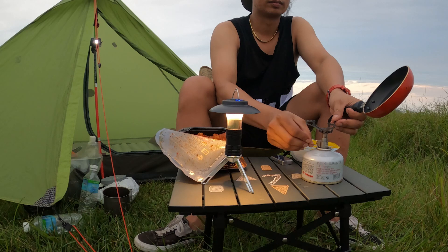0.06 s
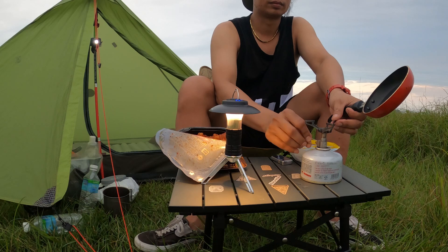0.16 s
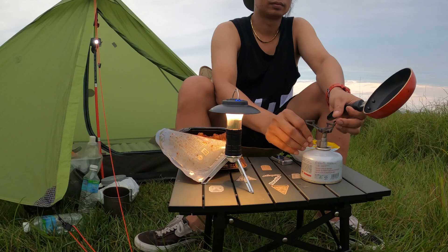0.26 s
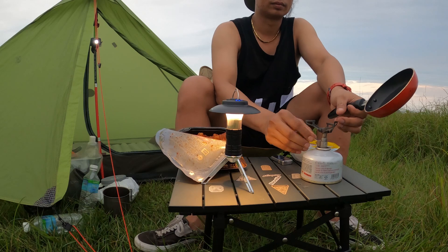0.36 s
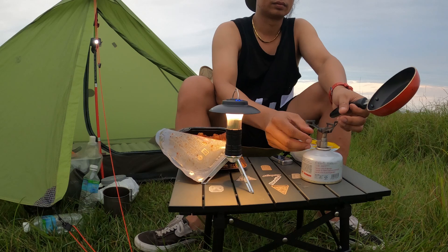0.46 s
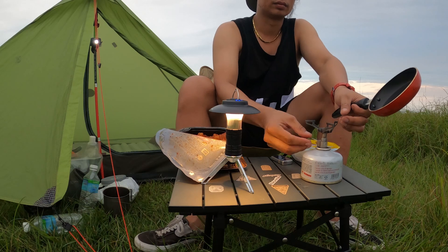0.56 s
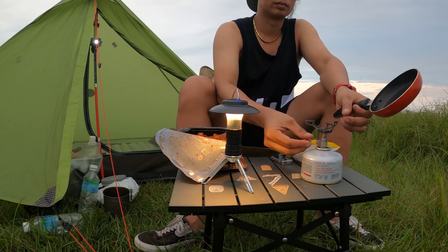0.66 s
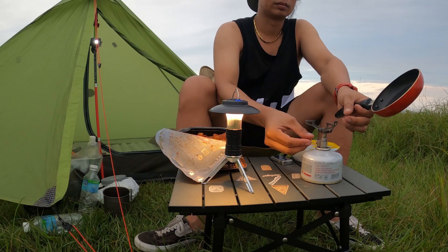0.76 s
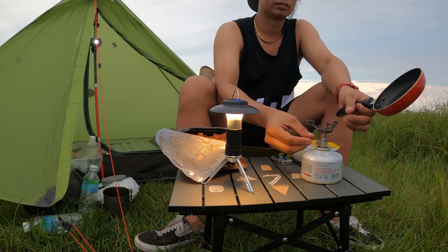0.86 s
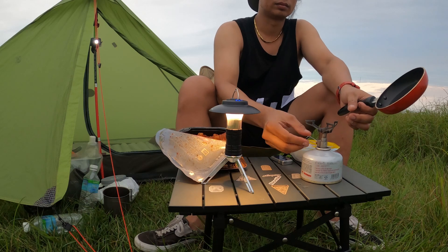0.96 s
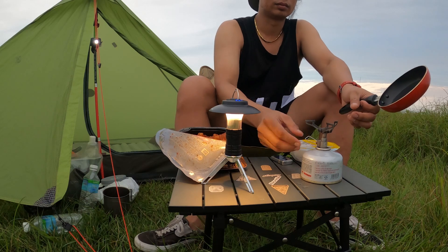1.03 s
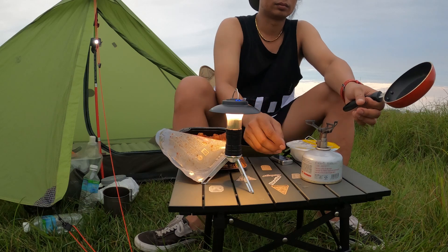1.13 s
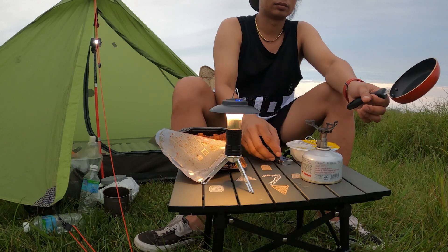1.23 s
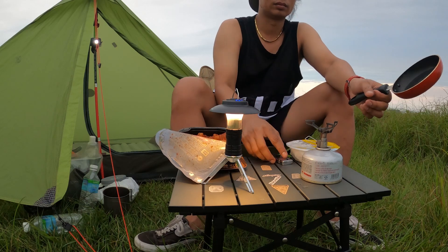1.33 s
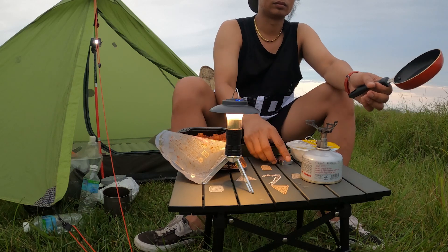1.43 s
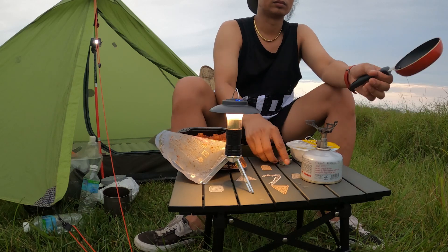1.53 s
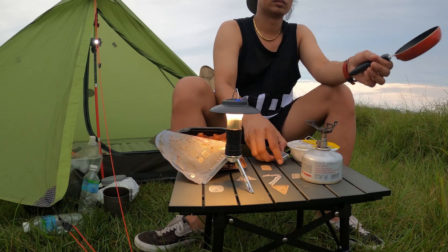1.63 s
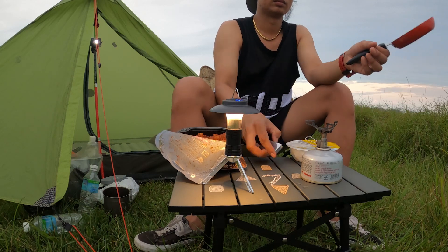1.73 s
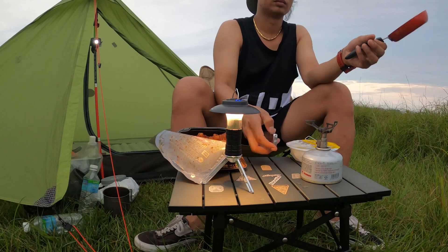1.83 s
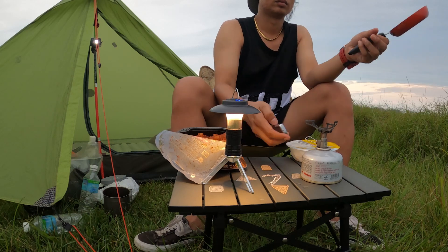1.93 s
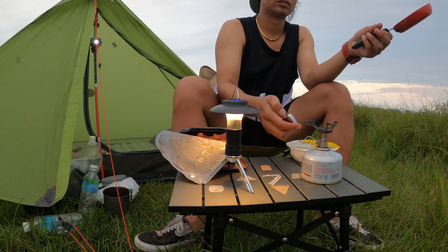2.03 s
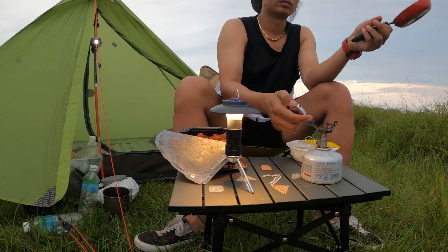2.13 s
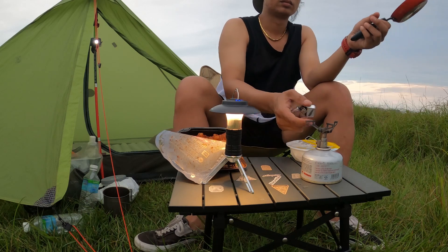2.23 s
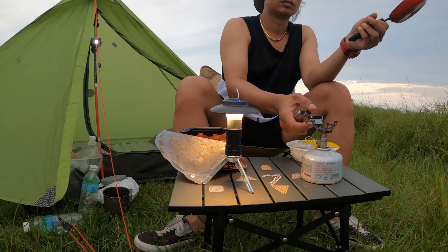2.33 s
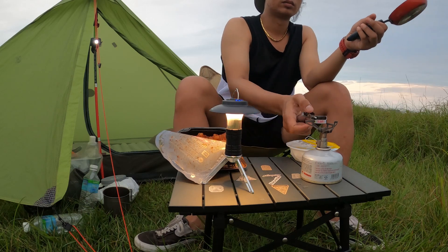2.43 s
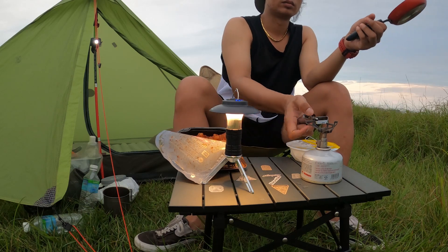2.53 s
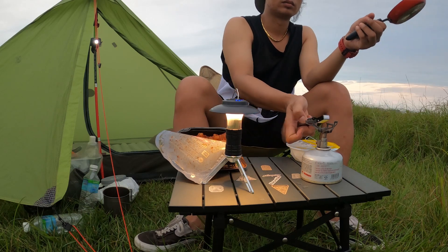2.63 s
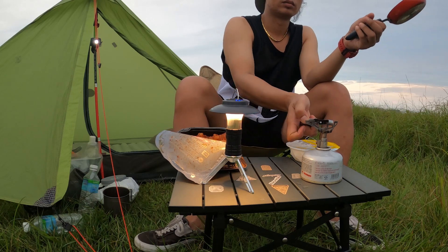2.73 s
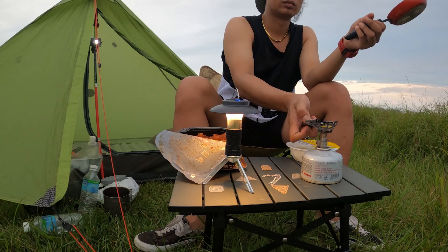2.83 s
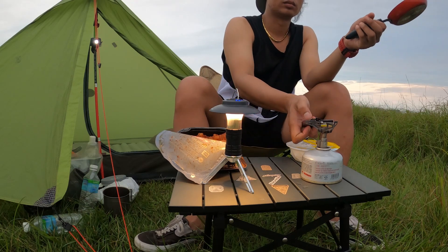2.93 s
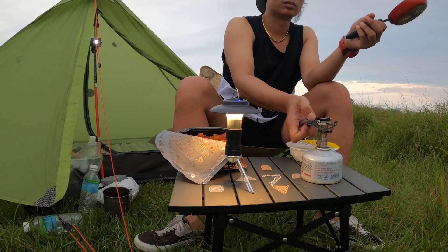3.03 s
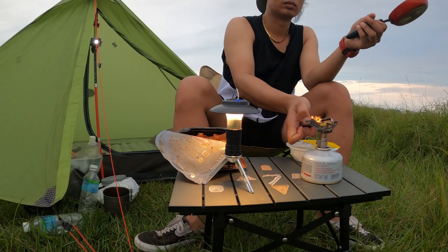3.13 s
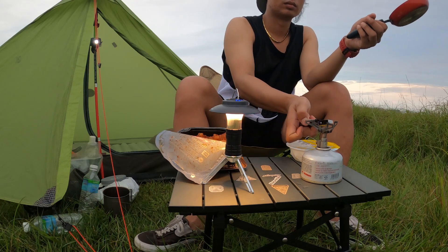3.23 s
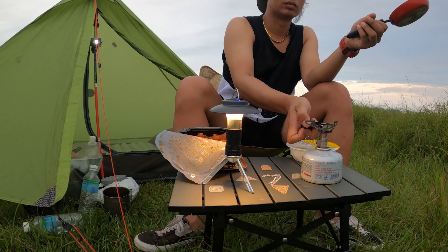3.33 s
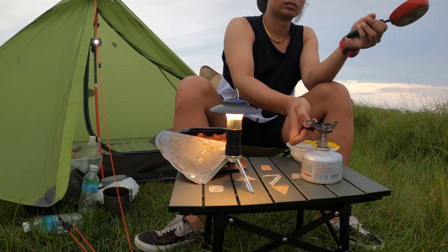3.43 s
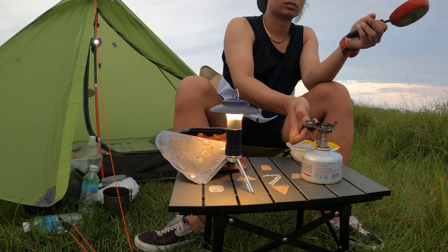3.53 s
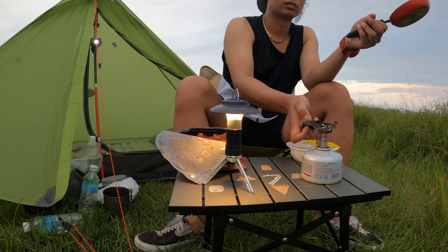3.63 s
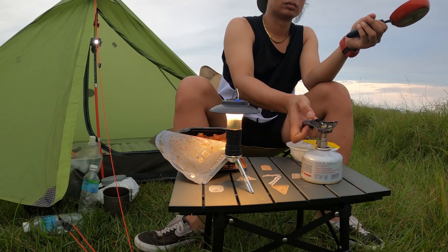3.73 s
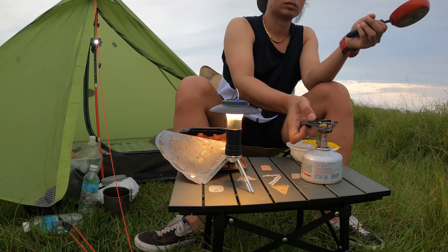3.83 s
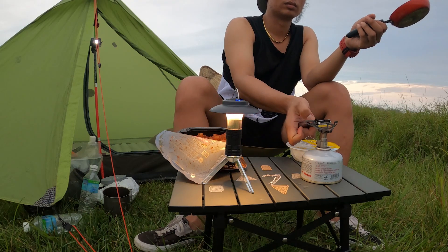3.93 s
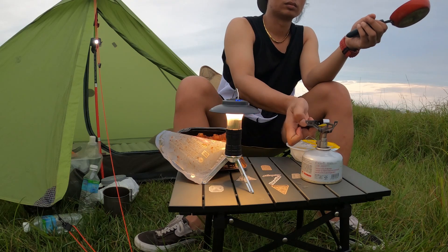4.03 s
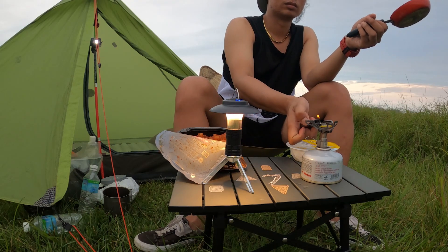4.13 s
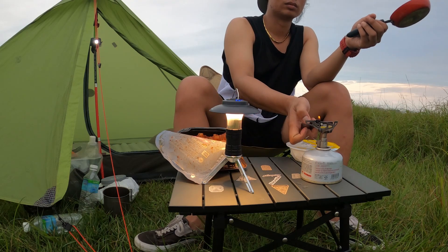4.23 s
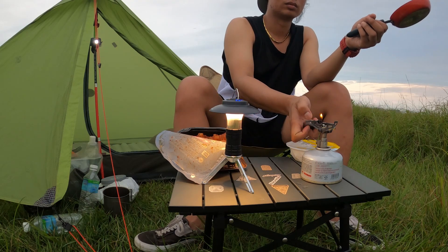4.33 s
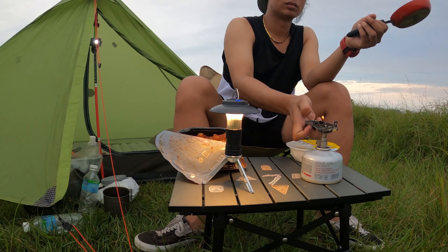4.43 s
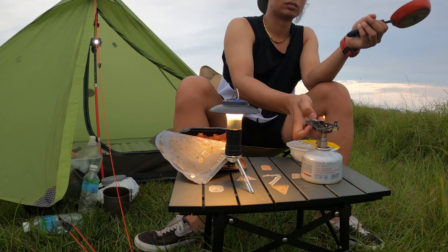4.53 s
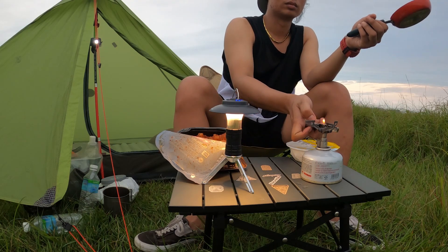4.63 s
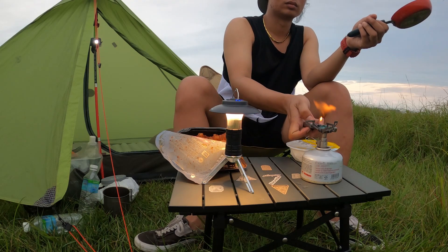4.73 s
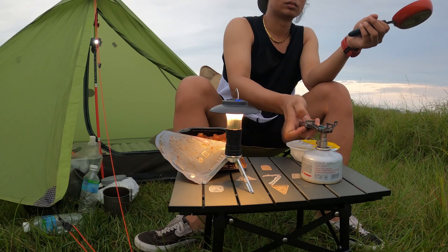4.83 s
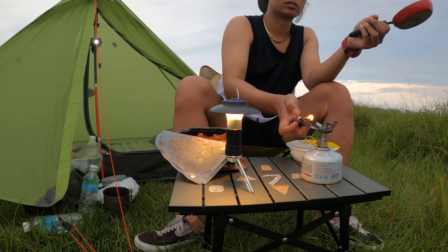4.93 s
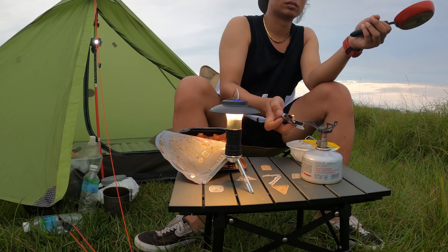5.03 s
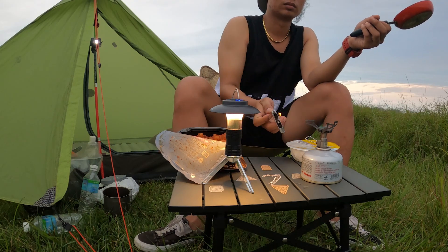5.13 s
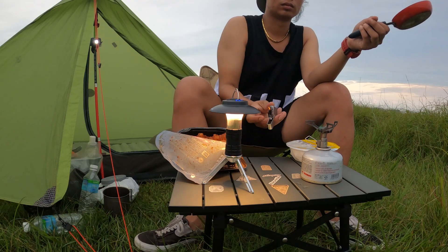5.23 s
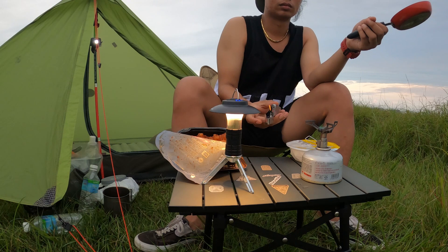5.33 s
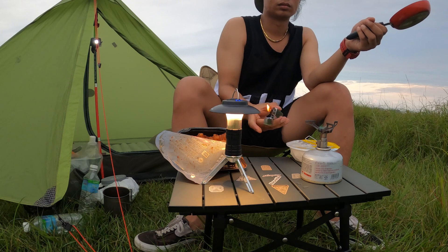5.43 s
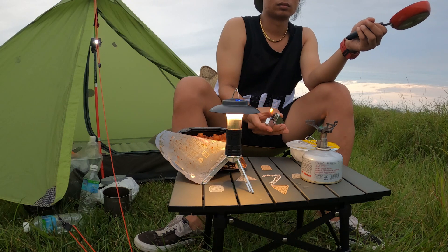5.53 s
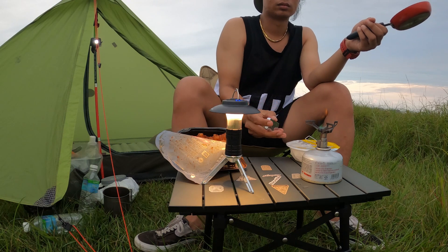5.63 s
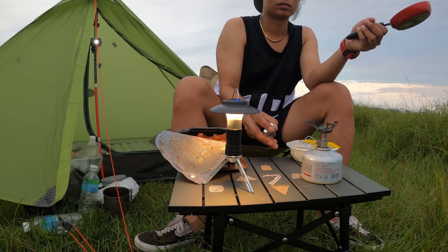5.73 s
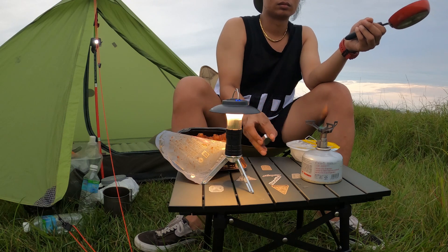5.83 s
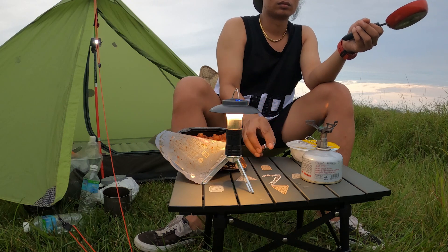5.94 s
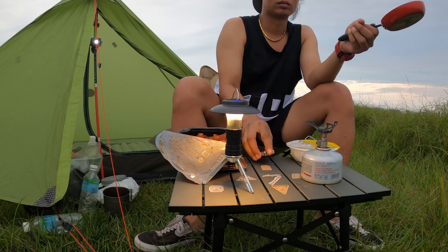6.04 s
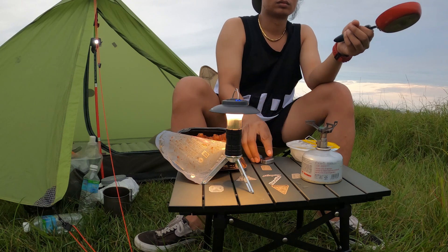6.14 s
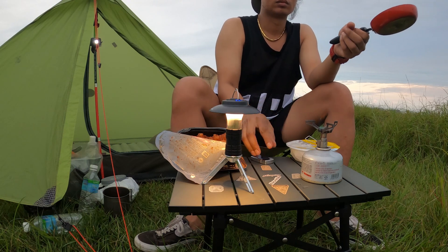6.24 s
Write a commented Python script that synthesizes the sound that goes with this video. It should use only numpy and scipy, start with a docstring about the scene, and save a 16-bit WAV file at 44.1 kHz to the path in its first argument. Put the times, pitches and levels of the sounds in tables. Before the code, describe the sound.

Gas stove hisses open outdoors, metal lighter flicks open, three flint strikes, then the burner catches with a thump and rushes steadily until the lid snaps shut.

```python
"""Outdoors at a slatted metal table, a camper opens a gas stove's valve and flicks open a flip-lid lighter.
Three strokes of the flint wheel sound over the hiss; the gas catches with a thump and burns with a steady
rush; the lid snaps shut. Low rumble and crickets in the grass lie behind.
Hiss, rush and rumble are shaped noise; contacts are bursts of grit, and struck metal adds dying tones.
Crickets are pulsing, falling tones; the thump is one low push of pressure."""
import sys
import numpy as np
from scipy import signal
from scipy.fft import rfft, irfft, next_fast_len
from scipy.io import wavfile
from scipy.ndimage import uniform_filter1d

SR = 44100
rng = np.random.default_rng(int(sys.argv[2]) if len(sys.argv) > 2 else 0)


def file_out(sig):
    """Save sig as 16-bit WAV at sys.argv[1]."""
    # one column per channel
    cols = np.atleast_2d(sig).T
    # limit, then scale
    lim = np.clip(cols, -1, 1)
    pcm = np.round(lim * 32767).astype(np.int16)
    wavfile.write(sys.argv[1], SR, pcm)


N = 276948
TIME = np.arange(N) / SR  # seconds
BINS = np.fft.rfftfreq(N, 1 / SR)  # Hz

# How strong the flame's noise is at each pitch: pitch_hz, relative_db
FLAME_SPECTRUM = [(40, -13), (90, -9), (160, 2.5), (300, -10), (430, -3), (670, -5.5), (850, -13.5),
                  (1200, -10), (1600, -12.5), (2200, -22.5), (3200, -20.5), (5000, -23.5), (8000, -59)]
# Tones of the lighter's case: pitch_hz, relative_db, t60_s (time to fall by 60 dB)
CASE_TONES = [(1934, -15.5, 0.07), (1990, -13.5, 0.076), (2104, -23, 0.16), (3200, 2, 0.013),
              (3500, 4, 0.013), (3940, -4.5, 0.043), (4960, -2, 0.038), (6590, -7.5, 0.3),
              (7280, -1.5, 0.084), (10450, -8.5, 0.2), (13400, -26, 0.2), (14330, -6, 0.055)]


def amp(db):
    """Turns decibels into a gain."""
    return 10 ** (np.asarray(db) / 20)


def unit(x):
    """Scales to an rms (average strength) of 1."""
    return x / np.sqrt(np.mean(x ** 2) + 1e-20)


def across(points, hz):
    """Reads a curve between its points, on a log-frequency axis."""
    point_hz, value = np.transpose(points)
    return np.interp(np.log(hz + 1), np.log(point_hz + 1), value)


def add(mix, s, sound):
    """Lays a sound into the mix at time s, or at the start if s is negative."""
    part = mix[max(round(s * SR), 0):][:len(sound)]
    part += sound[:len(part)]


def noise(points):
    """Steady noise with a given spectrum, at rms 1."""
    white = rng.standard_normal(N)
    return unit(irfft(rfft(white) * amp(across(points, BINS)), N))


def drift(hz, length=N):
    """Random wandering of rms 1, mostly slower than hz."""
    # Made at a low sample rate, then joined by straight lines
    step = max(int(SR / hz / 16), 1)
    size = next_fast_len(length // step + 200)
    slowness = 1 / (1 + (np.fft.rfftfreq(size, step / SR) / hz) ** 4)
    slow = irfft(rfft(rng.standard_normal(size)) * slowness, size)
    return np.interp(np.arange(length) / step, np.arange(size), unit(slow))


def focus(hz, centre_hz, fall_db, octaves=2):
    """A contact favours the pitches around its own; softer ones lie lower. Gives dB."""
    distance = abs(np.log2((hz + 1) / centre_hz))
    return -fall_db * np.minimum(distance, octaves)


def colour(x, points, centre_hz=2000, fall_db=0, size=2048):
    """Filters by a spectrum weighted by the contact; the filter acts only forward in time, with unit energy."""
    hz = abs(np.fft.fftfreq(size, 1 / SR))
    log_gain = np.log(amp(across(points, hz) + focus(hz, centre_hz, fall_db)))
    # The Hilbert transform finds the phase that makes the filter respond soonest
    taps = np.fft.ifft(np.exp(signal.hilbert(log_gain).conj())).real
    return signal.fftconvolve(x, taps / np.linalg.norm(taps))[:len(x)]


def grit(envelope):
    """Tiny contacts of random sign under an envelope."""
    return envelope * np.sign(rng.standard_normal(len(envelope)))


def grains(size_db, length):
    """Uneven catches, each a millisecond or two long."""
    slow = uniform_filter1d(rng.standard_normal(length), size=70)
    return unit(amp(size_db * unit(slow)))


def ring(tones, t, centre_hz, fall_db):
    """Struck metal rings in many dying tones, weighted by the contact."""
    hz, db, t60 = np.transpose(tones)[:, :, None]
    height = amp(db + focus(hz, centre_hz, fall_db, octaves=10))
    start_phase = rng.random(hz.shape)
    waves = height * amp(-60 * t / t60) * np.sin(2 * np.pi * (hz * t + start_phase))
    onset = 1 - np.exp(-t / 0.00027)
    return waves.sum(0) * np.sqrt(2 / np.sum(height ** 2)) * onset


def click(t, db, t60, centre_hz, fall_db, crack_db=3, tail_db=-36, tail_t60=0.061):
    """Metal meets metal: one sharp crack and a burst of chatter with a faint tail."""
    # Crack and tail levels are relative to the chatter
    snap_spectrum = [(200, -28.5), (600, -3), (950, -17), (1400, -12.5), (2100, -2.5), (2700, -2),
                     (3300, -6.5), (5800, 2), (7400, 1), (8600, -23), (10300, -14), (14000, -15),
                     (16000, -47)]  # lid contact noise: pitch_hz, relative_db
    fading = amp(-60 * t / t60) + amp(tail_db - 60 * t / tail_t60)
    chatter = fading * (1 - np.exp(-t / 0.000067))
    crack = amp(crack_db) * (t == 0)
    return amp(db) * colour(grit(chatter) + crack, snap_spectrum, centre_hz, fall_db)


def ports(x):
    """Sound from the right of centre reaches the left microphone port later and is shaded by the device's body."""
    phase_curve = [(60, -0.08), (400, -0.06), (1100, -0.28), (2400, -0.76), (4000, -0.99), (4700, -1.51),
                   (5600, -2.66), (6300, -3.67), (7000, -4.01), (7750, -5.61), (8300, -6.35), (9000, -6.36),
                   (9700, -7.13), (10200, -9.18), (12000, -9.79), (14000, -12.11)]  # pitch_hz, left_lead_rad
    balance_curve = [(60, 0.1), (400, -1.5), (1100, -3.0), (2400, -1.8), (4000, 0.7), (4700, 4.0),
                     (5600, 3.4), (6300, -1.9), (7000, -10.5), (7750, -12.9), (8300, -1.3), (9000, 1.8),
                     (9700, 8.8), (11500, 1.5), (14000, 0.3)]  # pitch_hz, left_minus_right_db
    # Half of each difference goes to either port
    half = np.exp(.5j * across(phase_curve, BINS)) * amp(across(balance_curve, BINS) / 2)
    return irfft(rfft(x) * np.array([half, 1 / half]), N)


def scatter(x, level_db=-21, t60=0.068):
    """Faint short reflections from table, tent and body: dying noise, separate for each port."""
    t = np.arange(SR // 8) / SR
    taps = rng.standard_normal((2, len(t))) * amp(-60 * t / t60) * (t > .002)
    taps = taps / np.linalg.norm(taps[0])
    return amp(level_db) * signal.fftconvolve(x[None], taps, axes=1)[:, :N]


def outdoors(level_db=-58.5, swell_db=0.9, lumps_db=6.0, lean_db=-2.0):
    """Lumpy, slowly swelling rumble from all around: alike at both ports in the bass, less so higher up."""
    air_spectrum = [(15, -8.5), (35, 2.5), (70, 5.5), (110, -5), (160, 2.5), (230, -5.5), (330, -16.5),
                    (600, -24.5), (1300, -23.5), (2800, -40), (8000, -32.5), (12000, -67)]  # outdoor noise: pitch_hz, relative_db
    # How much the air differs between the ports: pitch_hz, side_minus_mid_db
    width_curve = [(60, -22.5), (180, -9.5), (350, -3), (700, 1.5), (1500, -1.5), (4000, -6.5),
                   (10000, 2.5)]
    air = noise(air_spectrum)
    low = signal.sosfilt(signal.butter(1, 200, fs=SR, output="sos"), air)
    lumps = unit(amp(lumps_db * np.tanh(drift(4.7))))
    mid = air + low * (lumps - 1)
    width = amp(across(width_curve, BINS))
    side = width * rfft(noise(air_spectrum)) * np.array([[1], [-1]])
    pair = irfft((rfft(mid) + side) / np.hypot(1, width), N)
    lean = lean_db * np.array([[.5], [-.5]])  # left minus right, split evenly
    return amp(level_db + swell_db * drift(1.3) + lean) * pair


def cricket(sharpness=1.6, unsteady=.008):
    """Trills swell and fade; each wing stroke rubs out a puff of falling tone, made fuzzy by the uneven file."""
    # Several crickets, near and far, all slightly fuzzy:
    # start_s, length_s, level_db, pitch_hz, fuzz_turns (of phase)
    trills = [(-.165, 0.27, -69, 4680, .17), (-.132, 0.35, -73.5, 4950, .17), (0.282, 0.61, -73, 4080, .15),
              (0.425, 0.53, -74.5, 4430, 0.18), (3.721, .42, -70, 4400, .14),
              (4.178, 0.81, -60, 4460, 0.15)]
    strokes_per_s, sag_hz = 45.5, 180  # wing rate; pitch drop over one stroke
    rise_s, fade_s = .12, .08
    out = np.zeros(N)
    for start, length, db, hz, fuzz in trills:
        t = np.arange(SR) / SR + max(-start, 0)  # a trill may be under way at the start
        wing = t * strokes_per_s + unsteady * drift(8, len(t))
        sag = sag_hz * (wing % 1 - .5)
        turns = np.cumsum(hz - sag) / SR + fuzz * drift(420, len(t))
        tone = np.sin(2 * np.pi * turns)
        swell = np.clip(np.minimum(t / rise_s, (length - t) / fade_s), 0, 1)
        puffs = np.exp(-sharpness * np.cos(2 * np.pi * wing))
        add(out, start, amp(db) * swell * unit(puffs * tone))
    return out


def table(grain_db=2.5, rattle_db=-22):
    """Knocks rattle the slats and ring their tones; sliding things catch in uneven grains."""
    # Tones of the table: pitch_hz, relative_db, t60_s
    table_tones = [(240, -15, 0.029), (476, -8.5, 0.055), (904, -8.5, 0.044), (1050, -4.5, 0.048),
                   (1440, -2, 0.054), (1500, -6, 0.052), (2020, -11, 0.08), (2286, -3, 0.054),
                   (2610, 0, 0.018), (3450, -16, 0.026), (3900, -2.5, 0.03), (4600, -30, 0.036),
                   (5900, -20, 0.031)]
    # Contact noise of the table: pitch_hz, relative_db
    clatter_spectrum = [(100, -38.5), (400, 6.5), (700, -2.5), (1300, 5), (2500, -4.5), (4300, 4),
                        (6800, 0.5), (8200, -21.5), (12000, -21.5), (15000, -38.5)]
    # Knocks: start_s, contact_db, contact_t60_s, contact_hz, ring_db, ring_hz, ring_fall_db_per_octave
    knocks = [(.078, -32.5, 0.05, 7200, -23.5, 1500, 37), (.094, -19.5, 0.029, 2380, -27.5, 2200, 4),
              (0.236, -37.5, 0.034, 3530, -49.5, 477, 17), (0.344, -51.5, 0.027, 900, -57, 1250, 15),
              (0.382, -55, 0.023, 7000, -55.5, 1200, 20), (1.406, -29.5, 0.021, 3960, -60, 3960, 12),
              (1.434, -29.5, 0.025, 3450, -41, 3500, -4.5), (1.438, -29, 0.023, 1090, -26.5, 1190, -3.5),
              (1.63, -39, .04, 4640, -67, 500, 6), (1.785, -43, 0.066, 1340, -46, 1000, 8),
              (1.811, -37.5, .016, 2010, -59, 1500, -6)]
    # Things sliding: start_s, length_s, level_db, centre_hz, fall_db_per_octave
    scrapes = [(.063, 0.011, -60.5, 1500, 12), (.195, 0.025, -53, 1730, 10), (0.241, 0.035, -46.5, 1890, 8),
               (.381, 0.018, -49, 6600, 28), (.479, 0.031, -55, 1500, 9), (1.401, 0.044, -50.5, 3500, 5),
               (1.549, 0.0075, -53, 1010, 0.5), (1.639, 0.024, -47.5, 3500, 5.5),
               (1.684, .012, -46.5, 4160, 9)]
    knock_fall_db = 6  # per octave away from the contact pitch
    scrape_rise_s, scrape_stop_s = 0.0036, 0.011
    out, t = np.zeros(N), np.arange(SR // 5) / SR
    for s, db, t60, centre_hz, ring_db, *spot in knocks:
        fading = amp(-60 * t / t60) + amp(rattle_db - 60 * t / 0.12)
        rattle = fading * (1 - np.exp(-t / 0.0014))
        contact = amp(db) * colour(grit(rattle), clatter_spectrum, centre_hz, knock_fall_db)
        add(out, s, contact + amp(ring_db) * ring(table_tones, t, *spot))
    for s, length, db, *contact in scrapes:
        fade = np.exp(-np.maximum(t - length, 0) / scrape_stop_s)
        stroke = np.minimum(t / scrape_rise_s, 1) * fade
        catches = grit(stroke * grains(grain_db, len(t)))
        add(out, s, amp(db) * colour(catches, clatter_spectrum, *contact))
    return out


def lid():
    """The lighter's lid clicks and rings the hollow case."""
    # The lid is gripped, flipped open against its stop and later snapped shut:
    # start_s, contact_db, contact_t60_s, ring_db, centre_hz, fall_db_per_octave
    clicks = [(2.22, -45, 0.028, -49, 1840, 9), (2.229, -54, 0.018, -48.5, 1880, 15),
              (2.343, -21.5, 0.0083, -43, 2360, 21), (2.384, -35, 0.032, -43, 3200, 14),
              (2.402, -19.5, 0.0051, -60, 13000, 14), (2.4025, -26.5, 0.015, -18.5, 4070, 6.5),
              (5.763, -21, 0.0056, -50, 3600, 4), (5.7649, -9, 0.0096, -61, 1800, 6.5),
              (5.7674, -18.5, 0.012, -48, 6000, 2)]
    out, t = np.zeros(N), np.arange(SR // 2) / SR
    for s, db, t60, ring_db, *contact in clicks:
        ringing = amp(ring_db) * ring(CASE_TONES, t, *contact)
        add(out, s, click(t, db, t60, *contact) + ringing)
    return out


def flint(stop_s=0.0022, rasp_db=-17, rasp_s=0.023, teeth_db=2.5, thumb_db=-17.5, thumb_s=0.0024):
    """The wheel speeds up on the flint and stops; the thumb slips off, lands softly and jolts the case."""
    # Strokes of the flint wheel: peak_s, level_db, run_up_s
    strokes = [(2.774, -34.5, 0.0057), (3.2998, -28.5, 0.0041), (4.129, -29, 0.0024)]
    # The thumb drops on the case, which jolts once more: delay_after_peak_s, contact_db, ring_db
    jolts = [(.008, -39.5, -37.5), (.022, -51, -44.5)]
    # Contact noise of the flint: pitch_hz, relative_db
    flint_spectrum = [(150, -6), (700, -21), (1300, -11.5), (2500, -7), (3600, 1.5), (5300, 2.5),
                      (7300, -6.5), (9500, -19.5), (12000, -11), (15000, -30)]
    thumb_spectrum = [(60, 0.0), (450, -6), (900, -16), (3000, -42)]  # pitch_hz, relative_db
    out, t = np.zeros(N), np.arange(SR // 4) / SR
    lead = .1  # seconds of room ahead of the peak
    for s, db, run_up in strokes:
        after = t - lead
        speed = np.exp(-abs(after) / np.where(after < 0, run_up, stop_s))
        rasp = amp(rasp_db) * np.exp(-abs(after - .008) / rasp_s)
        teeth = grit(np.hypot(speed, rasp) * grains(teeth_db, len(t)))
        add(out, s - lead, amp(db) * colour(teeth, flint_spectrum))
        landing = grit(np.exp(-abs(after - .01) / thumb_s))
        add(out, s - lead, amp(db + thumb_db) * colour(landing, thumb_spectrum))
        for delay, contact_db, ring_db in jolts:
            tick = click(t, contact_db, t60=.02, centre_hz=3900, fall_db=8)
            ringing = amp(ring_db) * ring(CASE_TONES, t, centre_hz=2060, fall_db=19.5)
            add(out, s + delay, tick + ringing)
    return out


def jet(waver_db=0.52):
    """Gas hisses out of the jet and the burner's many holes; part of it arrives from all around."""
    # Hiss of the gas: pitch_hz, relative_db
    jet_spectrum = [(700, -27.5), (1500, -12.5), (2600, -10.5), (3100, -1), (3850, -4.5), (4400, 1.5),
                    (5600, 0), (6200, -1.5), (7000, -1), (8300, -9.5), (9500, -16), (11300, -23.5),
                    (14000, -28), (15000, -70)]
    # Strength of the part from all around: pitch_hz, relative_db
    spread_curve = [(300, 8.5), (2000, -5.5), (4500, -12), (6000, -12.5), (7500, -22), (9500, -4.5),
                    (14000, -1)]
    # Gas flow, as the valve is cracked open and then turned up: time_s, level_db
    flow_curve = [(0, -82), (.45, -75), (.88, -74), (.98, -60.5), (1.2, -55), (2.5, -57), (6.28, -58)]
    pair = rfft([noise(jet_spectrum), noise(jet_spectrum)])
    around = irfft(pair * amp(across(spread_curve, BINS)), N)
    flow_s, flow_db = np.transpose(flow_curve)
    level_db = np.interp(TIME, flow_s, flow_db) + waver_db * drift(16)
    return (ports(noise(jet_spectrum)) + around) * amp(level_db)


def ignition(s=4.8685, swell_s=0.0012, push_db=-8, leak_hz=42, puff_db=-36, puff_s=0.0033,
             flutter_db=-41, flutter_hz=130):
    """The flame flutters and puffs across the burner; the pooled gas expands in one push that swings back."""
    out, u = np.zeros(N), np.arange(SR // 5) / SR / swell_s
    push = (u / 3) ** 3 * np.exp(3 - u)  # one smooth hump with a peak of 1
    # Removing the lowest pitches makes the push swing back
    thump = signal.lfilter(*signal.butter(2, leak_hz, "high", fs=SR), push)
    add(out, s, -amp(push_db) * thump)
    puff_shape = np.exp(-((TIME - s + 0.0009) / puff_s) ** 2)
    puff = colour(grit(puff_shape), FLAME_SPECTRUM, 1700, 5.9)
    flutter_shape = np.exp(-((TIME - s + .015) / .013) ** 2)
    flutter = flutter_shape * np.sin(2 * np.pi * flutter_hz * TIME)
    return out + amp(puff_db) * puff + amp(flutter_db) * flutter


def flame(flicker_db=1.0, flutter_db=1.15, kindle_db=-11, kindle_s=0.048):
    """The flame kindles, takes hold with a flare and rushes on, with a slow flicker and a quick flutter."""
    catch_s, rise_s, burn_db = 4.885, 0.02, -45
    flare_db, flare_s = 5.5, 0.038  # extra level on catching, and how fast it dies away
    t = TIME - catch_s
    kindling = amp(kindle_db) * np.clip(1 + t / kindle_s, 0, 1) ** .5
    alight = np.maximum(np.clip(t / rise_s, 0, 1), kindling)
    flare = flare_db * np.exp(-np.maximum(t - rise_s, 0) / flare_s)
    level_db = burn_db + flare + flicker_db * drift(23) + flutter_db * drift(130)
    return noise(FLAME_SPECTRUM) * alight * amp(level_db)


def scene():
    """Stove, table and lighter close by, in the open air."""
    near = flame() + table() + lid() + flint()
    direct = ports(near + ignition() + cricket())
    return direct + scatter(near) + jet() + outdoors()


def record(dry):
    """Band limit: a steep filter removes what lies above its edge."""
    edge_hz = 15400
    taps = signal.firwin(511, edge_hz, window=("kaiser", 9), fs=SR)
    return signal.oaconvolve(dry, taps[None], "same")


dry = scene()
out = record(dry)
file_out(out)
```